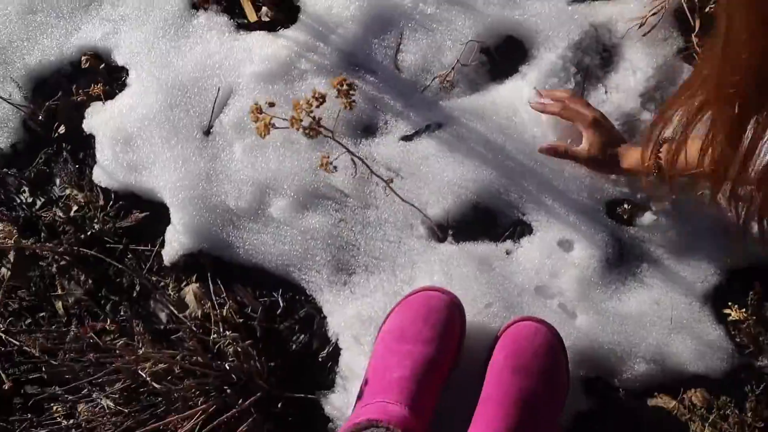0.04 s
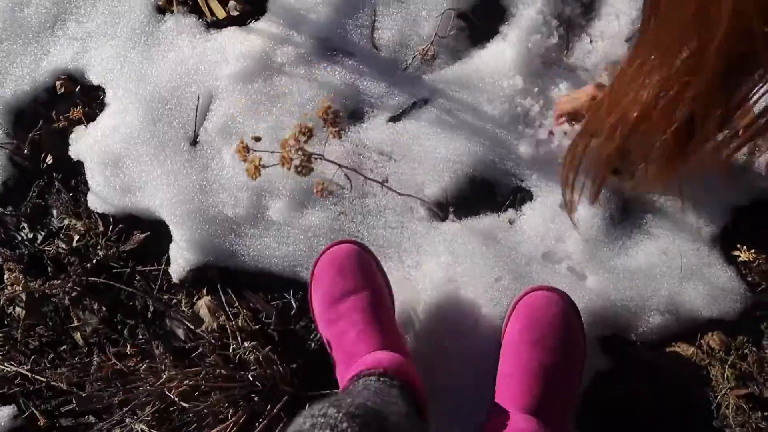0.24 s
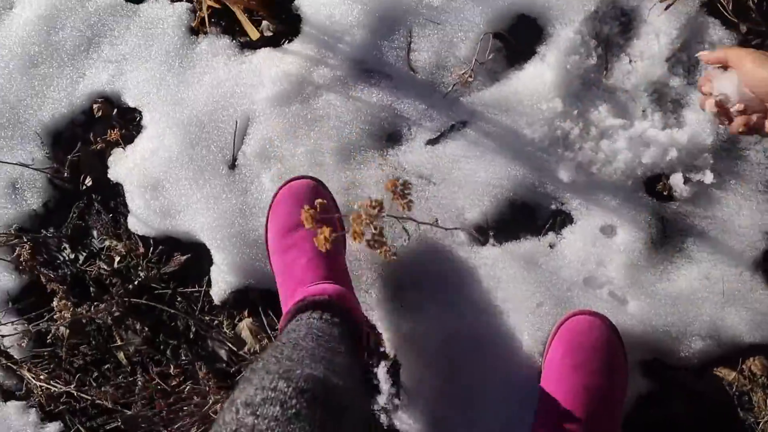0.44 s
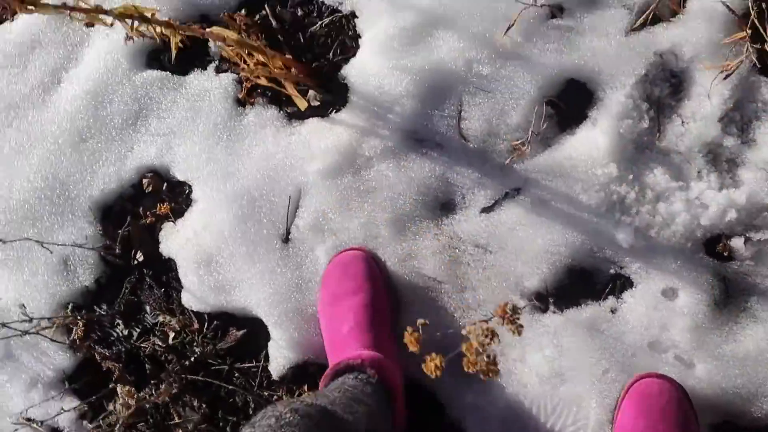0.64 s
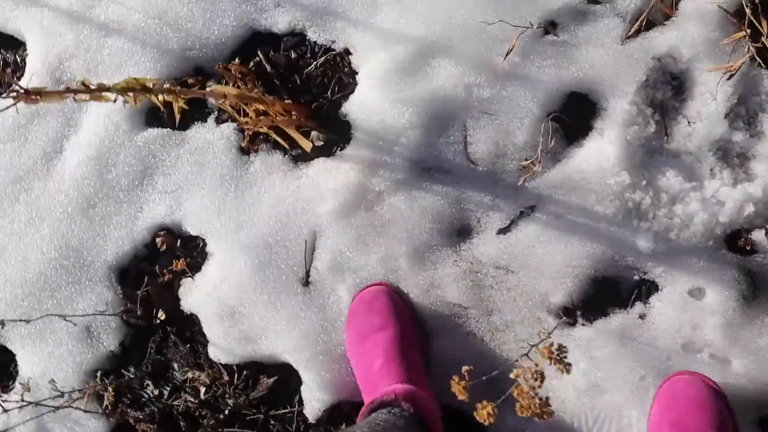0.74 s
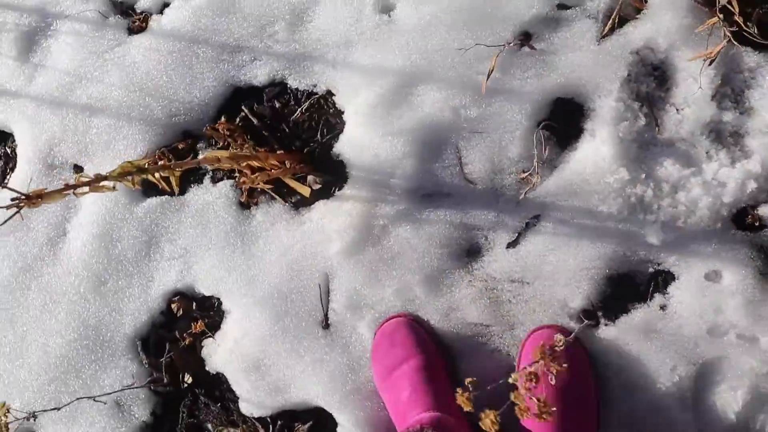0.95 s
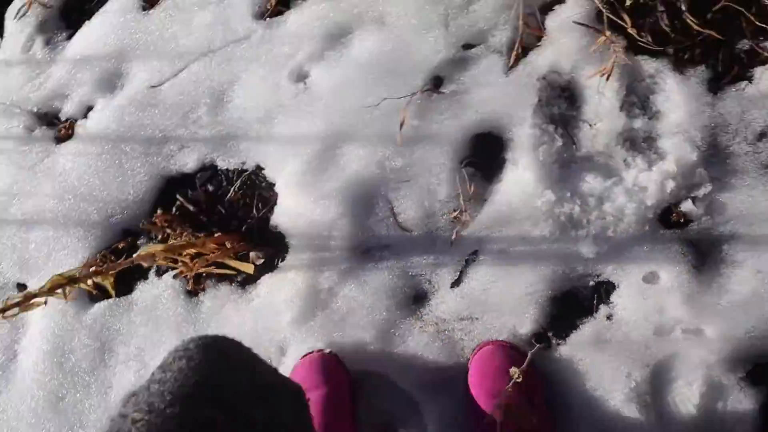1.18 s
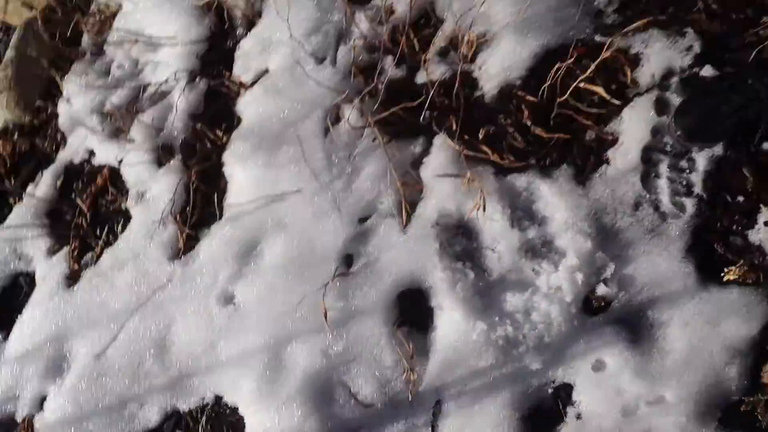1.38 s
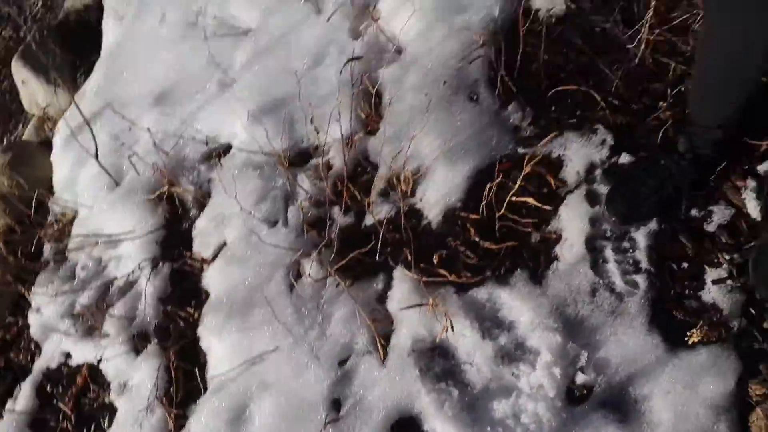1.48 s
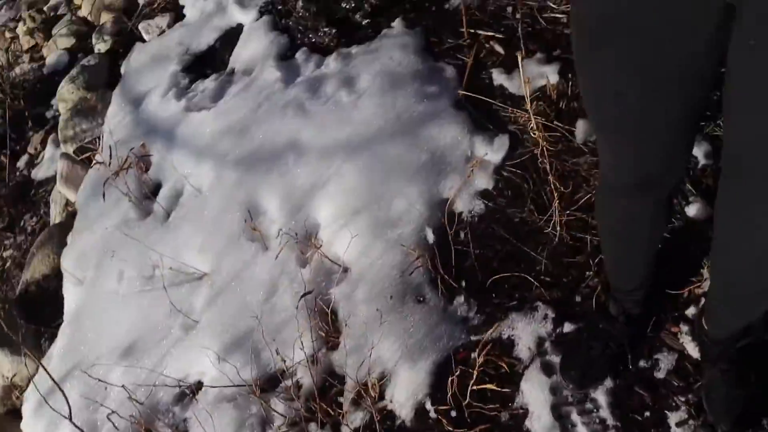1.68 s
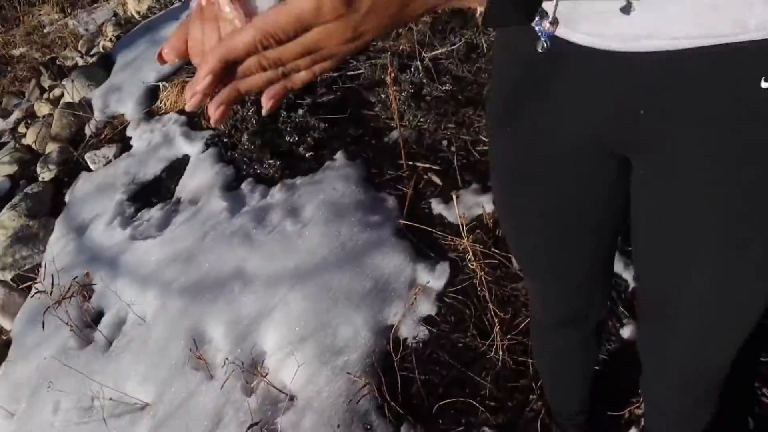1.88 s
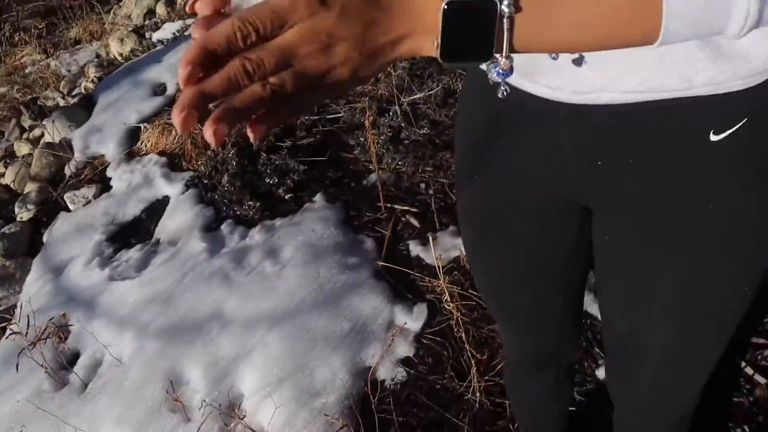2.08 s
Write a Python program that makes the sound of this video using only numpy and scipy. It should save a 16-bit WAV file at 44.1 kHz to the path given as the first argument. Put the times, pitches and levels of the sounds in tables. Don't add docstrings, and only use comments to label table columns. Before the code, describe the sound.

Close outdoor stereo sound of icy snow crust breaking in brief steps, with hollow pops and crackles, a strong crunch at one second, a twig snap, brushed dry stalks, and wind knocks at start and end.

```python
import sys
import numpy as np
from scipy import signal
from scipy.fft import rfft, irfft
from scipy.io import wavfile
from scipy.ndimage import uniform_filter1d, minimum_filter1d

SR = 44100
rng = np.random.default_rng(int(sys.argv[2]) if len(sys.argv) > 2 else 0)


def rack_gain(trim_db):
    fader = np.asarray(trim_db, float)
    return 10 ** (fader / 20)


def inscribe(sig):
    pcm = np.round(np.clip(np.atleast_2d(sig).T, -1, 1) * 32767)
    wavfile.write(sys.argv[1], SR, pcm.astype(np.int16))


N = 93624


def evened(x):
    return x / np.sqrt(np.mean(x ** 2) + 1e-20)


def read(points, hz):
    f, value = np.transpose(points)
    return np.interp(np.log(hz + 1), np.log(f + 1), value)


def add(mix, s, sound):
    at = round(s * SR)
    sound = sound[:, max(-at, 0):]
    part = mix[:, max(at, 0):][:, :sound.shape[1]]
    part += sound[:, :part.shape[1]]


def lumps(per_s):
    size = max(int(SR / per_s), 2)
    noise = rng.standard_normal(N + 8000)
    return evened(uniform_filter1d(uniform_filter1d(noise, size), size)[:N])


def ports(x, other, colour_db, side_db, shared):
    n, lean = len(x), -0.21
    mid, far = rfft(x) * rack_gain(colour_db), rfft(other) * rack_gain(colour_db)
    shared = np.clip(shared, 0, 1)
    side = rack_gain(side_db) * ((lean - 1j) * shared * mid + np.sqrt(1 - shared ** 2) * far)
    return np.array([irfft(mid, n), irfft(side, n)]) / np.sqrt(np.mean(rack_gain(colour_db) ** 2))


# (frequency [Hz], side minus mid [dB])
NEAR_SIDES = [(60, -52), (150, -53), (380, -39), (950, -19), (2380, -2), (5980, 2.5), (15000, 6.5)]


def near_side_db(hz):
    return read(NEAR_SIDES, hz)


def chance_sizes():
    spread_db = 3.3
    return rack_gain(spread_db * np.minimum(rng.exponential(1, N), 4))


def grains(click_db):
    out, t, grain_cycles = np.zeros(N), np.arange(600) / SR, 4.0
    for hz in np.geomspace(350, 15000, num=26):
        hits = chance_sizes() * (rng.random(N) < .16 * hz / SR)
        u = t * hz / grain_cycles
        ring = u * np.exp(-3 * u) * np.sin(2 * np.pi * hz * t)
        out += evened(signal.oaconvolve(hits, ring)[:N]) * np.sqrt(hz)
    z = rfft(out)
    z /= np.sqrt(uniform_filter1d(abs(z) ** 2, size=401)) + 1e-9
    clicks = chance_sizes() * (rng.random(N) < .1) * rng.choice([-1., 1.], N)
    mixed = evened(evened(irfft(z, N)) + rack_gain(click_db) * evened(clicks))
    return mixed * rack_gain(0.9 * lumps(per_s=300))


def bursts(table, colour, click_db, rise):
    fall_db, shared, widen_hz, pivot_hz = -11, 0.46, 2495, 3000
    out = np.zeros((2, N + SR))
    stream, spare = np.tile(grains(click_db), 2), np.tile(grains(click_db), 2)
    for start, length, db, tilt_db, width_db in table:
        at, n = max(round(start * SR), 0), round(1.3 * length * SR) + 64
        hz, u = np.fft.rfftfreq(n, 1 / SR), np.arange(n) / SR / length
        colour_db = read(colour, hz) + tilt_db * np.log2((hz + 100) / pivot_hz)
        side_db = near_side_db(hz) + width_db * hz / (hz + widen_hz) * 1.85
        shape = np.sin(np.pi / 2 * np.minimum(u / rise, 1)) ** 1.4
        shape *= rack_gain(fall_db * np.maximum(u - rise, 0) ** 2 / (1 - rise) ** 2)
        shape *= np.clip((1.3 - u) / 0.12, 0, 1)
        pair = ports(stream[at:at + n], spare[at:at + n], colour_db, side_db, shared)
        add(out, start, rack_gain(db) * shape * pair)
    return out[:, :N]


def cracks(table, t60, db_more, side_db):
    out, t = np.zeros((2, N + SR)), np.arange(2048) / SR
    draws = rng.random((len(table), 3))
    for (s, db, hz), (a, b, c) in zip(table, draws):
        ring = np.sin(2 * np.pi * hz * t)
        ring += 0.33 * np.sin(2 * np.pi * (hz * (1.49 + 0.33 * a) * t + b))
        ring *= np.minimum(t * hz / 1.2, 1) * rack_gain(-60 * t / (t60 * (0.66 + 1.1 * c)))
        ring /= abs(ring).max()
        side = rack_gain(side_db + near_side_db(hz)) * np.roll(ring, round(SR / hz / 4))
        add(out, s, rack_gain(db + db_more) * np.array([ring, side]))
    return out[:, :N]


# (frequency [Hz], level [dB])
FLOOR_COLOUR = [(120, -9), (220, -7), (310, -1.5), (430, -10), (640, -7), (1080, -20.5), (5270, -34.5),
                (12000, -29.5), (15800, -51)]
# (frequency [Hz], side minus mid [dB])
FLOOR_WIDTH = [(100, -90), (300, -25), (700, -14.5), (1500, 2), (3000, 5.5), (7000, 4.5), (15000, -2.5)]


def floor():
    hz = np.fft.rfftfreq(N, 1 / SR)
    colour_db = read(FLOOR_COLOUR, hz) + 6.3 * np.log2(np.clip(hz / 120, 1e-3, 1))
    side_db = read(FLOOR_WIDTH, hz)
    pair = ports(rng.standard_normal(N), rng.standard_normal(N), colour_db, side_db, 0.24)
    return rack_gain(-42 + 0.54 * lumps(5.1)) * pair


# (time [s], level [dB])
WIND_GUSTS = [(0, -23), (.07, -22.5), (.11, -29), (.17, -20.5), (0.27, -16.5), (0.322, -31.5), (.46, -45),
              (0.901, -45), (.96, -35.5), (1.023, -27.5), (1.06, -44), (1.76, -48.5), (1.915, -38.5),
              (1.95, -30), (2.12, -35.5)]
# (frequency [Hz], level [dB per Hz])
WIND_COLOUR = [(25, -14), (60, -4), (117, -2), (218, -12), (370, -27), (600, -39)]


def wind():
    lump_db, wind_db, side_level_db, lean, apart, rumble_hz = 2, -1, -16, -0.13, 0.44, 57.7
    s, db = np.transpose(WIND_GUSTS)
    level_db, hz = np.interp(np.arange(N) / SR, s, db), np.fft.rfftfreq(N, 1 / SR)
    colour_db = read(WIND_COLOUR, hz) - 30 * np.log2(np.maximum(hz / 600, 1))
    side_db = 10.0 * np.log2((hz + 1) / 150)
    mid, side = ports(rng.standard_normal(N), rng.standard_normal(N), colour_db, side_db, 0)
    mid = evened(evened(mid) * rack_gain(lump_db * lumps(49)))
    side = evened(evened(side) * rack_gain(lump_db * lumps(65))) * rack_gain(side_level_db) + lean * mid
    blown = rack_gain(level_db + wind_db) * np.array([mid, side * rack_gain(apart * (level_db + 20))])
    return signal.sosfilt(signal.butter(2, rumble_hz, "high", fs=SR, output="sos"), blown)


# (time [s], peak level [dB], pitch [Hz])
PORT_THUMPS = [(0.269, -27, 209), (1.004, -23.5, 227), (1.119, -31, 179), (1.945, -19, 229),
               (1.95, -27.5, 103), (1.957, -21, 297), (1.989, -33, 186), (2.019, -31, 119.4),
               (2.058, -28, 114), (2.071, -20, 227), (.058, -15, 72), (.55, -33, 62.5), (.6, -35, 80),
               (.945, -26.5, 109), (.965, -25.5, 132), (1.005, -29, 75.4), (2.113, -18.5, 240)]


def thumps():
    return cracks(PORT_THUMPS, t60=0.044, db_more=-1.2, side_db=31.2)


# (start [s], length [s], level [dB], tilt [dB per octave], width [dB])
STALK_RUSTLES = [(.09, 0.15, -39, -2, -1), (.17, 0.18, -37.5, -1, 0), (.958, 0.033, -45.5, -0.5, -0.5),
                 (1.505, 0.072, -40.5, -4, -5), (1.555, 0.047, -40, 15, -4), (1.652, 0.044, -34, 3.5, -3.5),
                 (1.67, 0.11, -42, -5.5, -1), (1.722, 0.097, -38.5, 0.5, -3), (1.755, 0.16, -41, -6, 1.5),
                 (1.875, .012, -45, 16, -12), (2.1, 0.039, -51.5, 7, -27.5), (.385, 0.011, -50, -8, 15.5),
                 (.415, 0.0094, -57.5, 4, 10.5), (.445, 0.013, -56.5, 2, 8.5), (.485, .014, -43.5, -7, 8),
                 (1.611, 0.018, -40.5, 4, 1.5), (.736, 0.012, -43.5, 4, 2.5), (.832, 0.0089, -55.5, 8, 3),
                 (1.99, 0.012, -49, -8, 10), (1.97, .15, -55.5, 3.5, 2.5), (.88, 0.1, -56.5, 6, 3)]
# (frequency [Hz], level [dB per Hz])
STALK_COLOUR = [(710, -17.5), (1200, -9), (1800, -6), (2760, -5), (4930, -3.5), (11300, 1), (12800, -2),
                (15500, -28)]


def rustles():
    return bursts(STALK_RUSTLES, STALK_COLOUR, click_db=2.5, rise=0.42)


# (time [s], peak level [dB], pitch [Hz])
STALK_SNAPS = [
    (0.129, -31, 10430),
    (0.1378, -29, 11500),
    (1.1243, -53, 6840),
    (1.517, -35, 11800),
    (1.5664, -37, 10700),
    (1.6127, -41.5, 10800),
    (1.6224, -42, 5900),
    (1.8787, -32.5, 10040),
    (1.9934, -64, 11200),
]


def snaps():
    return cracks(STALK_SNAPS, t60=0.011, db_more=4, side_db=-2)


# (time [s], peak level [dB], pitch [Hz])
TWIG_CRACKS = [
    (.117, -33, 3100),
    (1.2764, -25, 2800),
    (1.2766, -36, 8200),
    (1.2768, -38, 13000),
    (1.2793, -24, 5500),
    (1.2793, -30, 9300),
    (1.2795, -26, 2700),
    (1.2795, -39, 14500),
    (1.2845, -34, 4500),
]


def twigs():
    return cracks(TWIG_CRACKS, t60=.0045, db_more=0, side_db=5)


# (time [s], peak level [dB], pitch [Hz])
CRUST_POPS = [(0.062, -15, 980), (0.364, -27.5, 1070), (0.388, -38, 730), (0.487, -28, 866),
              (0.531, -24, 955), (0.592, -15, 724), (0.615, -17, 830), (0.716, -22.5, 900),
              (0.739, -20, 876), (1.061, -21, 1170), (1.077, -13, 1730), (1.554, -17.5, 1260),
              (1.622, -25.5, 1080), (1.857, -22.5, 573)]


def pops():
    return cracks(CRUST_POPS, t60=0.014, db_more=-5.5, side_db=0.56)


# (time [s], peak level [dB], pitch [Hz])
MORE_CRUST_POPS = [(.037, -27, 2800), (.047, -25.5, 1790), (.051, -25, 3000), (.063, -24.5, 3600),
                   (.067, -24, 3070), (.456, -42, 1450), (.473, -45, 694), (.4865, -30.5, 1250),
                   (.531, -30.5, 1380), (.608, -37, 1430), (.612, -32, 2400), (.619, -30, 1860),
                   (.635, -33, 686), (.664, -28, 1100), (.672, -31, 1500), (.677, -23.5, 1020),
                   (.699, -26, 900), (.712, -25, 990), (.744, -27, 770), (1.045, -22, 3170),
                   (1.051, -38, 1260), (1.054, -34, 1060), (1.058, -17, 1130), (1.064, -15.5, 2170),
                   (1.068, -22.5, 970), (1.072, -21, 1340), (1.084, -22, 1540), (1.099, -29, 6130),
                   (1.125, -39, 5500), (1.136, -32, 574), (1.152, -31, 3800), (1.062, -20.5, 540),
                   (.056, -23.5, 2120), (.07, -26, 2020), (.648, -31, 613)]


def more_pops():
    return cracks(MORE_CRUST_POPS, t60=0.015, db_more=-2.3, side_db=1.7)


# (start [s], length [s], level [dB], tilt [dB per octave], width [dB])
SNOW_CRUNCHES = [(-.05, 0.2, -40, 1.5, 2), (.035, 0.052, -34, -2, 1), (.35, 0.21, -49.5, -2.5, -13),
                 (.5, 0.17, -47.5, 8, 4.5), (.576, 0.029, -37, -0.5, -3.5), (.6, 0.027, -32.5, 0, -5),
                 (.622, 0.051, -35, -3, -1.5), (.648, 0.076, -36, 0, 0), (.708, 0.03, -40, -9, 16.5),
                 (.735, 0.025, -39, -1.5, 2.5), (.75, 0.082, -48.5, -0.5, 7), (.795, 0.011, -47.5, -2, -5),
                 (.83, 0.086, -48, -3.5, 3), (1.026, 0.035, -39.5, 2, 4), (1.04, 0.067, -22, -1, 1),
                 (1.118, 0.05, -36.5, -1, 3), (1.14, 0.11, -39, 1, -1.5), (1.276, 0.017, -40.5, -3.5, 8),
                 (1.3, 0.17, -48, 2, 3), (1.365, 0.14, -41, -0.5, -5), (1.45, 0.045, -42.5, -3.5, 3),
                 (1.549, 0.081, -39.5, 0, -4), (1.549, .018, -34.5, -1, -3), (1.514, .008, -40, -1.5, 0),
                 (1.615, 0.07, -39, -1, -2), (1.842, 0.052, -36, -0.5, 2.5), (1.885, 0.08, -35.5, -4.5, 4)]
# (frequency [Hz], level [dB per Hz])
CRUST_COLOUR = [(180, -18), (400, -10.5), (1090, -5.5), (2170, -9.5), (4000, -11.5), (8000, -16),
                (11500, -16), (13500, -24), (15800, -63)]


def crunches():
    return bursts(SNOW_CRUNCHES, CRUST_COLOUR, click_db=-10, rise=0.36)


def scene():
    background = floor() + wind() + thumps()
    plants = rustles() + snaps() + twigs()
    snow = pops() + more_pops() + crunches()
    mid, side = background + plants + snow
    return np.array([mid + side, mid - side])


# (frequency [Hz], level [dB])
MID_THRESHOLD = [(4500, -110), (6000, -87), (8000, -79.5), (12000, -81), (13500, -79), (16000, -84)]
# (frequency [Hz], level [dB])
SIDE_THRESHOLD = [(60, -68), (500, -81), (900, -110), (12000, -110), (14000, -98), (16000, -86)]


def mute_weak_bands(pair):
    lead = 392
    pair = np.pad(pair, ((0, 0), (lead, 0)))
    hz, t, z = signal.stft(pair, SR, "cosine", nperseg=2048)
    band = np.arange(len(hz)) // 32
    band[:32] = -(np.arange(32) // 8) - 1
    band = np.unique(band, return_inverse=True)[1]
    join = band[:, None] == np.arange(band.max() + 1)
    average = (join / join.sum(0)).T
    level_db = 10 * np.log10(average @ abs(z) ** 2 + 1e-20)
    level_db = (level_db + 1.1 * rng.standard_normal(level_db.shape))[:, band]
    centre = (average @ hz)[band]
    masked = (level_db[0] < level_db[1] - 8) & (centre[:, None] > 6000)
    busy = level_db[0, 40:140].mean(0) > -58.5
    edge = np.diff(pair[0], 2, append=np.zeros(4096))
    peak = -minimum_filter1d(-abs(edge), size=1024)
    crest = peak / np.sqrt(uniform_filter1d(edge ** 2, size=1024) + 1e-14)
    sharp = (crest[::1024][:len(t)] > 6.0) & ~busy
    masked = np.where(busy, centre[:, None] > 11600, masked & ~sharp)
    z[0] *= (level_db[0] + 12 * sharp > read(MID_THRESHOLD, centre)[:, None]) & ~masked
    z[1] *= level_db[1] > read(SIDE_THRESHOLD, centre)[:, None]
    return signal.istft(z, SR, "cosine", nperseg=2048)[1][:, lead:lead + N]


def low_pass(x):
    return signal.sosfilt(signal.butter(12, 15620, fs=SR, output="sos"), x)


def record(dry):
    mid, side = mute_weak_bands(np.array([dry[0] + dry[1], dry[0] - dry[1]]) / 2)
    return low_pass(np.array([mid + side, mid - side]))


dry = scene()
out = record(dry)
inscribe(out)
```